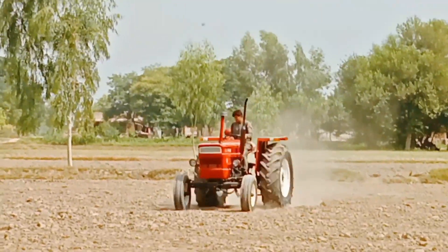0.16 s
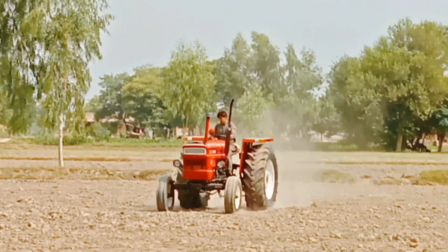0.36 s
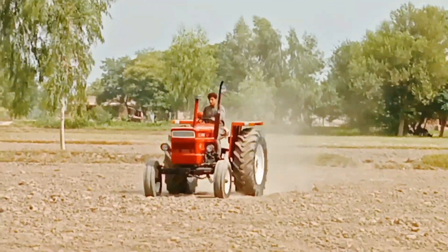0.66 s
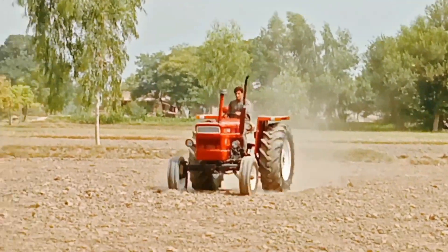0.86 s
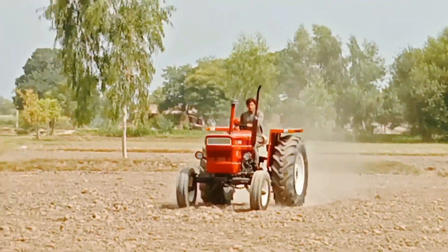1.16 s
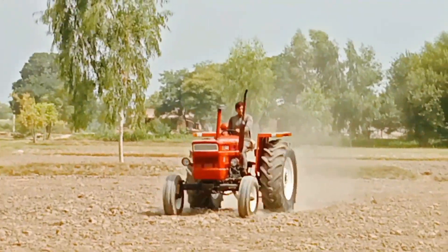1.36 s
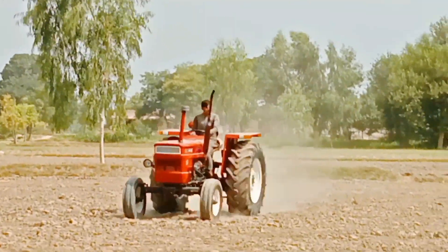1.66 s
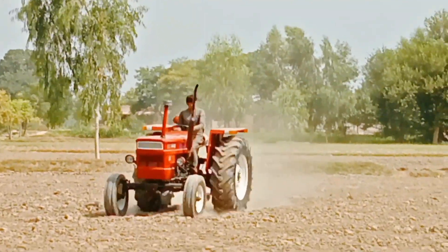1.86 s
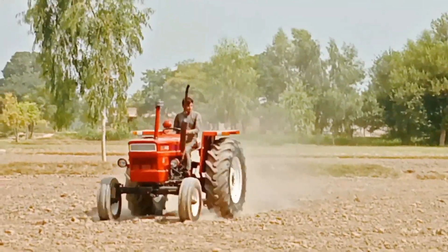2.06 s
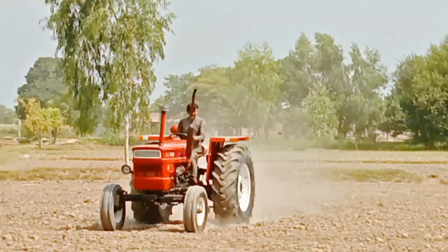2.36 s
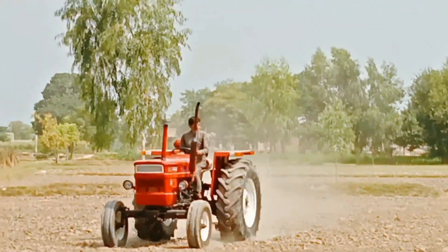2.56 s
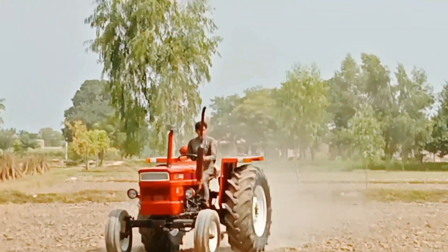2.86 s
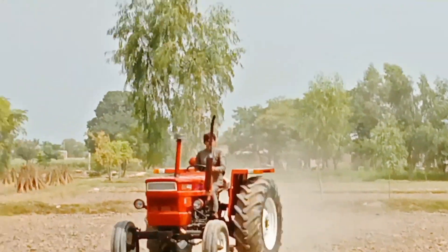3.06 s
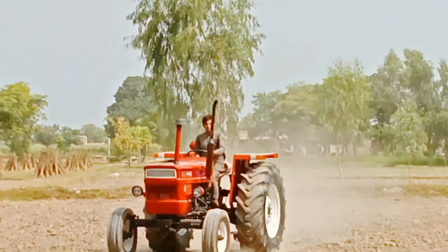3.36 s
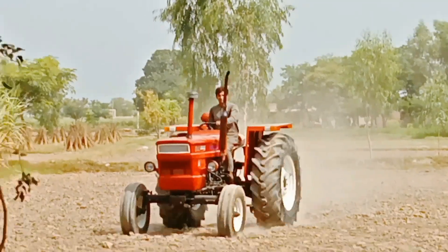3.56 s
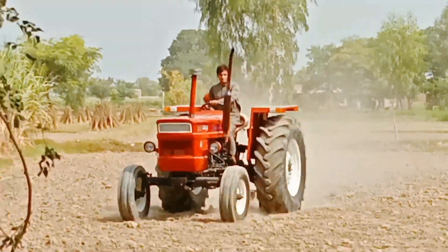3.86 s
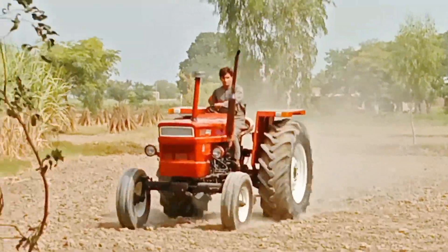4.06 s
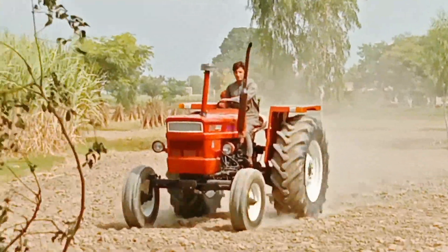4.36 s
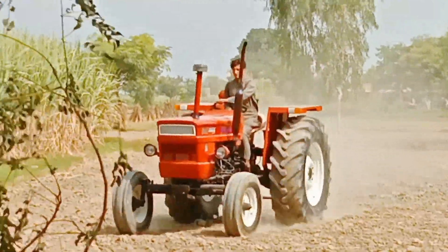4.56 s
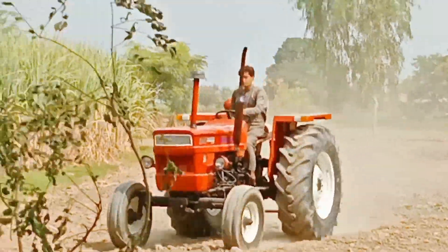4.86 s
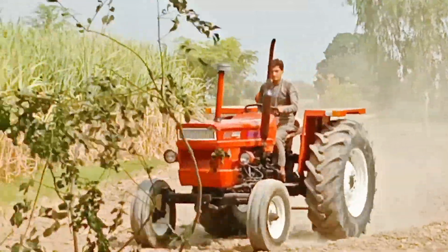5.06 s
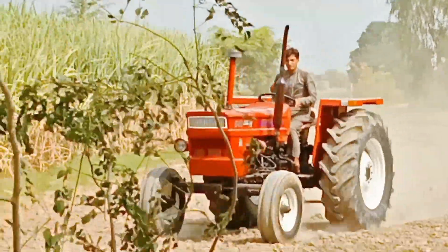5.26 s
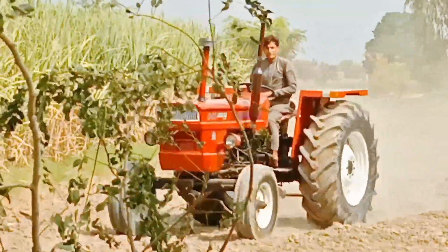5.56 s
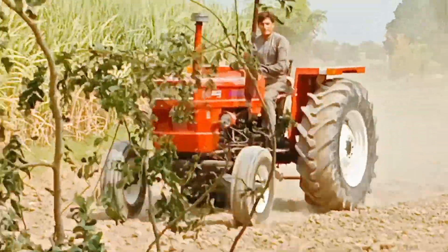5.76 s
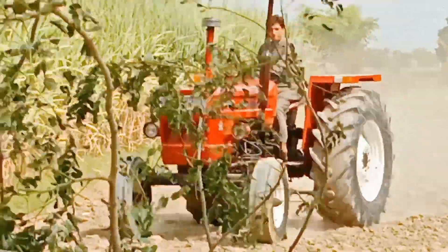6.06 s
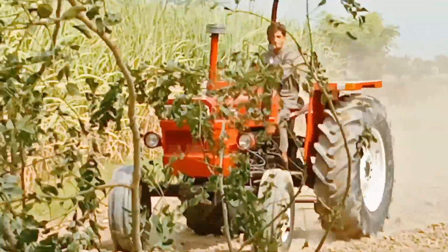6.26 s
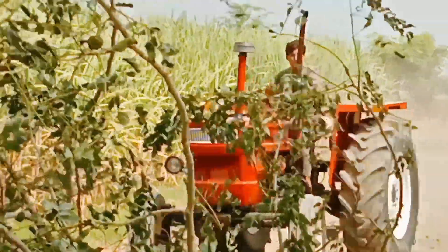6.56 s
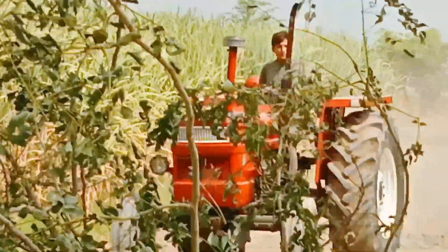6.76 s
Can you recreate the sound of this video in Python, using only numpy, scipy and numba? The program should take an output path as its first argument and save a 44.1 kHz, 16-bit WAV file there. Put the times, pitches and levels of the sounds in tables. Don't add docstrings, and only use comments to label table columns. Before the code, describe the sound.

Rattling four-cylinder tractor engine at near-constant speed, buried at times by heavy wind buffeting, with sharp metallic cracks near the end.

```python
import sys
import numpy as np
from scipy import signal
from scipy.fft import rfft, irfft, next_fast_len
from scipy.io import wavfile
from scipy.ndimage import uniform_filter1d
from numba import njit

SR = 44100
rng = np.random.default_rng(int(sys.argv[2]) if len(sys.argv) > 2 else 0)


def gain_from_db(level_db):
    decades = np.asarray(level_db, float) / 20
    return 10 ** decades


def dump(signal):
    limited = np.clip(np.atleast_2d(signal).T, -1, 1)
    pcm = np.round(limited * 32767).astype(np.int16)
    wavfile.write(sys.argv[1], SR, pcm)


N = 304731

# t/s, f/Hz
SPEED = [(0.0, 51.43), (0.5, 51.2), (1.0, 51.54), (1.5, 51.5), (2.0, 53.0), (2.5, 52.21), (3.0, 52.25),
         (3.5, 52.05), (4.0, 50.66), (4.5, 50.56), (5.0, 49.7), (5.5, 48.47), (6.0, 46.17), (6.5, 46.32),
         (7.0, 46.85)]


def tractor():
    start = 2.85
    firings = start + np.cumsum(curve(*np.transpose(SPEED))) / SR
    tonal = exhaust(firings) + gears(firings)
    return clatter(firings) + 2 ** .5 * tonal + cracks()


CYLINDER_DB = [
    0,
    -3.5,
    -4,
    -5,
]
# f/Hz, width/Hz, level over the body/dB
PANELS = [(690, 200, -15.5), (1239, 193, 4.5), (1478, 80, 1.5), (1920, 210, 1), (2626, 237, 8.5),
          (3780, 1400, 0.5), (4280, 290, 11.5), (5530, 100, -28), (6710, 1800, 8.5), (10350, 1200, 2),
          (11260, 500, -7), (13000, 800, 4.5), (3620, 19, 6), (4220, 47, -8), (1645, 18, 6)]
# t/s, block level/dB, brightness/dB
EFFORT = [(0, -41, 0), (.44, -41.5, -2.5), (.62, -41.5, 2), (.95, -37.5, 1.5), (1.45, -38.5, 1),
          (2.05, -41, 0), (2.5, -39.5, -3), (3.1, -38.5, -1), (3.77, -39.5, -1), (4.5, -36.5, -1.5),
          (5.2, -37.5, -0.5), (6.2, -39.5, -1), (6.31, -36, 0.5), (6.41, -40, -0.5), (6.5, -37, 2),
          (6.61, -37, -1.5), (6.67, -36, 3), (6.91, -44.5, -1)]
# level over the block/dB, gain per dB of brightness/dB
PART_MIX = [
    (-1, 1.5),
    (-9.5, 0.7),
    (-21, .7),
]


def clatter(firings):
    firing, phase = firings.astype(int), firings % 1
    chance = rng.standard_normal((firing[-1] + 1, 1 + len(PANELS))).T
    knock_db = np.array(CYLINDER_DB)[firing % 4] + 0.8 * chance[0][firing]
    knock = gain_from_db(knock_db) * np.tanh(phase / .1) * np.exp(-phase / .36)

    struck = rng.random(N) < 900 / SR
    ticks = struck * gain_from_db(4.6 * rng.exponential(size=N)) * rng.standard_normal(N)
    drive = knock * (rng.standard_normal(N) + level(ticks, -18))
    drive += gain_from_db(-12 + 1.2 * walk(12)) * rng.standard_normal(N)
    drive /= np.sqrt(uniform_filter1d(drive ** 2, size=6000))

    rung = drive + gain_from_db(3) * svf(rng.standard_normal(N), np.full(N, 10000.), 1.0, True)
    strike_db = 2.5
    for (hz, width, db), blow in zip(PANELS, chance[1:]):
        jolt = 1 + .008 * walk(3)
        patchy_db = (1.3 + hz / 9000) * walk(5)
        struck_panel = drive * gain_from_db(strike_db * blow[firing])
        rung += gain_from_db(db + patchy_db) * svf(struck_panel, hz * jolt, width / hz, True)

    s, block_db, bright_db = np.transpose(EFFORT)
    over_db = [0] + [db + share * bright_db for db, share in PART_MIX]
    return sum(gain_from_db(curve(s, block_db + db)) * part for part, db in zip(parts(rung), over_db))


# f/Hz, density/dB per Hz
BODY = [(24, -66), (40, -31), (114, -5.5), (404, -5.5), (715, 2), (831, -8.5), (1180, -2), (1750, -5),
        (2540, -9), (2810, -11), (3780, -2), (4850, -17.5), (5500, -13), (8810, -34.5), (15200, -31)]
# lowest f/Hz, highest f/Hz
PARTS_HZ = [
    (1000, 3200),
    (3300, 4700),
    (4800, 8000),
    (9000, 15000),
]


def parts(x):
    size = next_fast_len(N + 4096)
    hz = np.arange(2049) * SR / 4096 + 1
    body_hz, body_db = np.transpose(BODY)
    colour_db = np.interp(np.log(hz), np.log(body_hz), body_db)
    cepstrum = irfft(np.log(gain_from_db(colour_db)))
    cepstrum[1:2048] *= 2
    cepstrum[2049:] = 0
    response = irfft(np.exp(rfft(cepstrum)))
    y = rfft(x, size) * rfft(response, size)

    hz = np.arange(len(y)) * SR / size
    seams = [np.clip((hz - lo) / 300 + 1, 0, 1) for lo, hi in PARTS_HZ[1:]]
    seams = [0 * hz + 1] + seams + [0 * hz]
    out = []
    for k, (lo, hi) in enumerate(PARTS_HZ):
        inside = (hz > lo) & (hz < hi)
        rms = np.sqrt(2 * np.sum(abs(y[inside]) ** 2) / size / N)
        out.append(irfft(y * (seams[k] - seams[k + 1]), size)[:N] / rms)
    return out


# multiple of the firing rate, level/dB
EXHAUST = [
    (1, -57),
    (2, -45),
    (3, -58),
]


def exhaust(firings):
    return sum(gain_from_db(db + 2.5 * walk(20)) * np.sin(2 * np.pi * k * firings) for k, db in EXHAUST)


# t/s, length/s, level/dB
GEAR_SONG = [
    (1.94, 0.29, -48.5),
    (5.38, .4, -49.5),
    (5.74, 0.19, -40.5),
]


def gears(firings):
    teeth = 13.55
    load = np.sqrt(abs(spells(GEAR_SONG, rest_db=-60.5, edge_s=0.092)))
    return load * gain_from_db(3.5 * walk(30)) * np.sin(2 * np.pi * teeth * firings + 1.0 * walk(40))


# t/s, peak level/dB
CRACKS = [(0.2573, -26.5), (1.0363, -28.5), (1.1133, -24), (1.2685, -29), (3.24, -26), (3.257, -26),
          (3.277, -19), (3.296, -26), (6.3046, -28), (6.3305, -22), (6.348, -28), (6.4595, -26),
          (6.4822, -19), (6.502, -16), (6.5235, -30), (6.629, -22), (6.6503, -16.5), (6.673, -20),
          (6.693, -31), (6.845, -29)]


def cracks():
    blow, t = np.zeros(N), np.arange(1000) / SR
    for at, db in CRACKS:
        blow[int(at * SR):][:len(t)] += gain_from_db(db - 7) * np.exp(-t / .0035) * np.tanh(t / .0004)
    bright = signal.butter(6, (2600, 7000), "band", fs=SR, output="sos")
    dull = signal.butter(2, (900, 2800), "band", fs=SR, output="sos")
    burst = level(signal.sosfilt(bright, rng.standard_normal(N)), 0)
    body = level(signal.sosfilt(dull, rng.standard_normal(N)), -3.5)
    return blow * (burst + body)


# t/s, length/s, level/dB, rasp under the thump/dB
GUSTS = [(-.05, 0.092, -24, -13), (0.097, 0.041, -26, -20), (0.291, 0.22, -20.5, -11.5),
         (0.548, 0.12, -22, -21.5), (0.714, 0.351, -23.5, -14.5), (1.053, .16, -24.5, -25.5),
         (1.413, .2, -28, -18.5), (2.09, 0.09, -27, -24), (2.196, 0.202, -22, -19),
         (2.431, .09, -19.5, -16), (2.533, 0.327, -14, -14), (2.885, 0.15, -20.5, -24),
         (3.064, 0.32, -22, -16.5), (3.368, 0.267, -20.5, -16), (3.63, .42, -21, -15),
         (4.062, .16, -21, -16.5), (4.232, 0.259, -24, -17.5), (4.506, 0.122, -28.5, -19),
         (4.686, .27, -32.5, -24), (4.959, 0.281, -19.5, -17.5), (5.26, 0.22, -32.5, -22),
         (5.375, 0.294, -32, -17), (5.725, .16, -27.5, -19), (5.897, .18, -18.5, -17.5),
         (6.098, 0.1, -20, -12.5), (6.226, .36, -19.5, -15), (6.59, 0.049, -29.5, -21),
         (6.635, 0.15, -17, -11), (6.798, .2, -13, -11)]
# t/s, level/dB, length/ms, rasp under the thump/dB
SLAMS = [(0.0, -12, 55, -9), (0.355, -18, 39, 5), (0.482, -14.5, 21, -5), (0.518, -10, 48, -10.5),
         (0.843, -9, 27, -29), (0.949, -12, 22, -21.5), (0.991, -7.5, 31, -26), (1.51, -12, 31, -12),
         (2.215, -7, 9.3, -16.5), (2.331, -10.5, 57, -9.5), (2.557, -10, 54, -16), (2.627, -15, 40, -14.5),
         (2.705, -6.5, 26, -10), (2.832, -7.5, 41, -6.5), (2.997, -14.5, 52, -13.5), (3.356, -3, 13, -15.5),
         (3.43, -13, 22, -1.5), (3.562, -9.5, 94, -12.5), (3.735, -2.5, 27.7, -3.5), (3.825, -11, 14, -21),
         (3.974, -11.5, 55, -13), (4.145, -13, 91, -17), (5.906, -8.5, 14.3, -14), (6.104, -10, 28, -10),
         (6.377, -3.5, 57, -16), (6.535, 0, 25, -11), (6.577, 1, 24, -13), (6.714, -5, 16.3, -14.5),
         (6.762, -11.5, 36, -3), (6.858, -14.5, 54, -9)]
# t/s, level/dB, rasp under the thump/dB
PUFFS = [(.102, -16.5, -18), (.308, -19.5, -19), (0.411, -18, -17), (0.649, -24, -32.5), (.769, -15, -14),
         (.896, -16.5, -15), (1.039, -16, -16.5), (1.159, -12, -37), (1.574, -14.5, -19),
         (2.16, -11.5, -39), (2.272, -15.5, -8), (2.45, -22, -14.5), (2.927, -11, -22),
         (3.172, -16.5, -2.5), (3.211, -12, -19), (3.88, -16, -9.5), (4.031, -17.5, -6.5),
         (4.275, -14, -26.5), (4.44, -12.5, -12.5), (4.856, -18, -17), (4.98, -11.5, -28.5),
         (5.224, -10.5, -34), (5.403, -18, -19), (5.494, -20, -13.5), (5.549, -17, -25), (5.944, -19.5, 2),
         (6.047, -13, -12.5), (6.23, -10.5, -21), (6.463, -15.5, -17), (6.651, -19.5, 3)]


def wind():
    calm_db, calm_rasp_db, edge_s, puff_ms = -46.5, -23, 0.022, 32.2
    t = np.arange(N) / SR
    flutter = gain_from_db(2 * walk(30) + 2.3 * walk(70)) ** 2
    power = spells(GUSTS, calm_db, edge_s) * flutter
    gust_rasp_db = [row[3] for row in GUSTS] + [calm_rasp_db]
    weighted_rasp = spells(GUSTS, calm_db, edge_s, gust_rasp_db) * flutter
    puffs = [(at, db, puff_ms, rasp_db) for at, db, rasp_db in PUFFS]
    for at, db, ms, rasp_db in list(SLAMS) + puffs:
        spread = ms * 0.00023
        near = slice(max(int((at - 4 * spread) * SR), 0), int((at + 4 * spread) * SR))
        swell = gain_from_db(db - 1.42) ** 2 * np.exp(-((t[near] - at) / spread) ** 2 / 2)
        power[near] += swell
        weighted_rasp[near] += swell * rasp_db
    rasp_db = weighted_rasp / power

    thump_hz, thump_hz_per_rasp_db = 292, 5.5
    corner = (thump_hz + thump_hz_per_rasp_db * rasp_db) * 1.095 * gain_from_db(1.94 * walk(60))
    corner = np.clip(corner, 60, 400)
    thump = low(rng.standard_normal(N), corner, 1.64)
    thump = low(low(thump, 1.226 * corner, 1.16), 385.0, 0.96)
    thump = signal.sosfilt(signal.butter(2, 75, "high", fs=SR, output="sos"), thump)

    reach = 560 * gain_from_db(0.13 * (rasp_db - calm_rasp_db) + 2.0 * walk(50))
    rasp = svf(rng.standard_normal(N), np.full(N, 450.), 0.84, True)
    rasp = low(low(rasp, reach, 1.42), 1.49 * reach, 1.9)
    rasp_gain = gain_from_db(rasp_db + 1.03 + 2.9 * walk(120))
    flow = (even(thump, 500, 0.19) + rasp_gain * even(rasp, 300, 0.25)) * np.sqrt(power)
    port = signal.butter(3, 64, "high", fs=SR, output="sos")
    return signal.sosfilt(port, low(flow, 1040.0, 1.48))


# share of its length, f/Hz, level/dB
WHISTLE = [(0, 3750, -12), (.07, 3720, 2), (.18, 3350, 0), (.22, 3000, -20), (.27, 2700, -1),
           (.4, 2400, -4), (.7, 2180, 0), (.93, 2180, -1), (1, 2220, -18)]
# t/s, length/s, pitch factor, level/dB
BIRD = [
    (.455, .14, 1.01, -43),
    (.835, .135, .975, -41),
    (1.235, .15, .98, -47),
    (1.66, .165, 1., -41.5),
]


def bird():
    out = np.zeros(N)
    share, hz, db = np.transpose(WHISTLE)
    waver, hoarse = 1 + .012 * walk(200), gain_from_db(3 * walk(150))
    for at, length, factor, note_db in BIRD:
        u = np.linspace(0, 1, int(length * SR))
        start = int(at * SR)
        pitch = np.interp(u, share, hz) * factor * waver[start:][:len(u)]
        loudness = gain_from_db(np.interp(u, share, db) + note_db)
        out[start:][:len(u)] += loudness * np.sin(2 * np.pi * np.cumsum(pitch) / SR)
    echoes = gain_from_db(-15) * np.roll(out, int(0.03 * SR)) + gain_from_db(-18) * np.roll(out, int(.1 * SR))
    return 2 ** .5 * hoarse * (out + echoes)


def spells(rows, rest_db, edge_s, weight=None):
    on, weight = np.zeros(N), weight or [1] * (len(rows) + 1)
    for row, w in zip(rows, weight):
        on[max(int(row[0] * SR), 0):int((row[0] + row[1]) * SR)] += w * gain_from_db(2 * row[2])
    k = max(int(edge_s * SR), 1)
    soft = uniform_filter1d(uniform_filter1d(on, k), k // 2 + 1)
    return weight[-1] * gain_from_db(2 * rest_db) + soft


def even(x, size, share):
    local_power = uniform_filter1d(uniform_filter1d(x ** 2, size), size)
    return level(x / local_power ** share, 0)


def level(x, db):
    return x * gain_from_db(db) / np.sqrt(np.mean(x ** 2))


def curve(s, value):
    return np.interp(np.arange(N) / SR, s, value)


def walk(rate):
    k = int(SR / rate)
    held = np.repeat(rng.standard_normal(N // k + 1), k)
    return 1.35 * uniform_filter1d(uniform_filter1d(held, k), k)[:N]


def low(x, hz, damp):
    return svf(x, hz * np.ones(N), damp, False)


@njit
def svf(x, hz, damp, band):
    y, b, l = np.empty(len(x)), 0., 0.
    for i in range(len(x)):
        g = np.tan(np.pi * hz[i] / SR)
        v = (b + g * (x[i] - l)) / (1 + g * (g + damp))
        lowpass = l + g * v
        b, l = 2 * v - b, 2 * lowpass - l
        y[i] = damp * v if band else lowpass
    return y


@njit
def follow(x, attack, release):
    y, e = np.empty(len(x)), 0.
    for i in range(len(x)):
        e += (abs(x[i]) - e) * (attack if abs(x[i]) > e else release)
        y[i] = e
    return y


def scene():
    return (tractor() + wind() + bird())[None]


def top_cut(x):
    return signal.sosfilt(signal.butter(12, 15380, fs=SR, output="sos"), x)


def record(dry):
    ceiling, treble_hz, knee, duck_power = .8, 5460, .3, 0.64
    ahead = np.append(dry[0, 60:], np.zeros(60))
    gain = np.minimum(1, ceiling / (follow(ahead, 0.1, 0.0002) + 1e-9))
    treble = signal.sosfiltfilt(signal.butter(2, treble_hz, "high", fs=SR, output="sos"), dry)
    duck = np.minimum(1, knee / (follow(ahead, 0.016, 0.00046) + 1e-9)) ** duck_power
    held = np.clip((dry - (1 - duck) * treble) * gain, -.88, .88)
    return top_cut(held)


dry = scene()
out = record(dry)
dump(out)
```